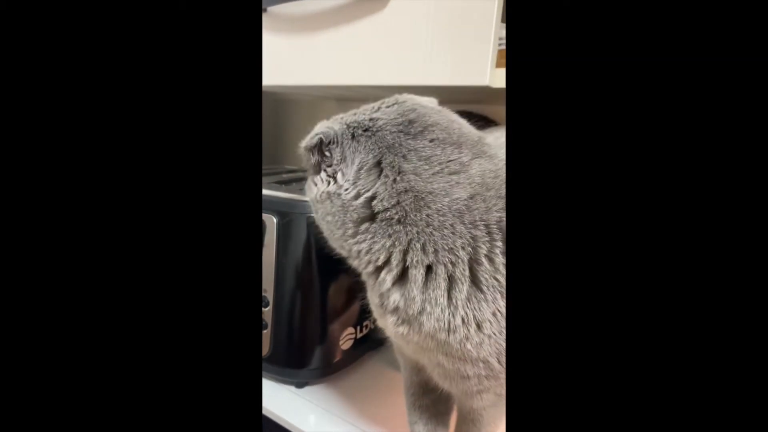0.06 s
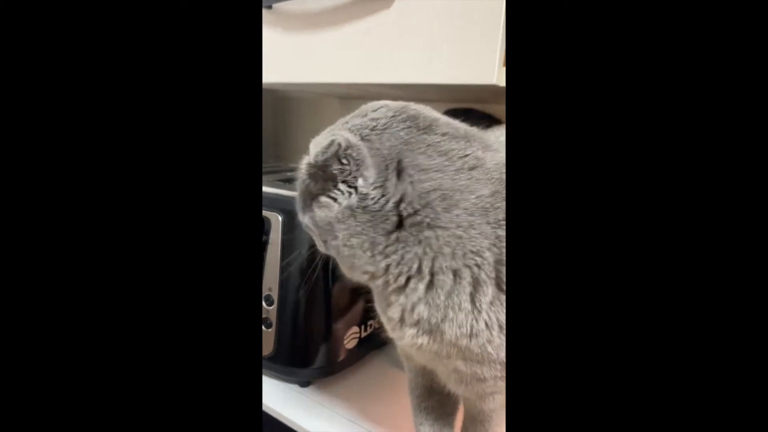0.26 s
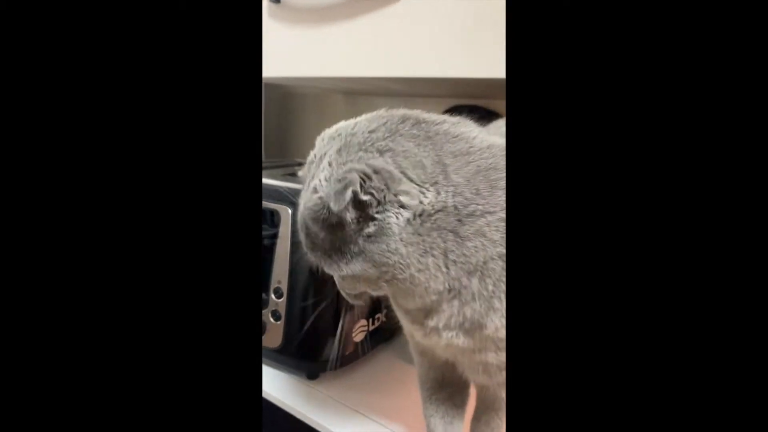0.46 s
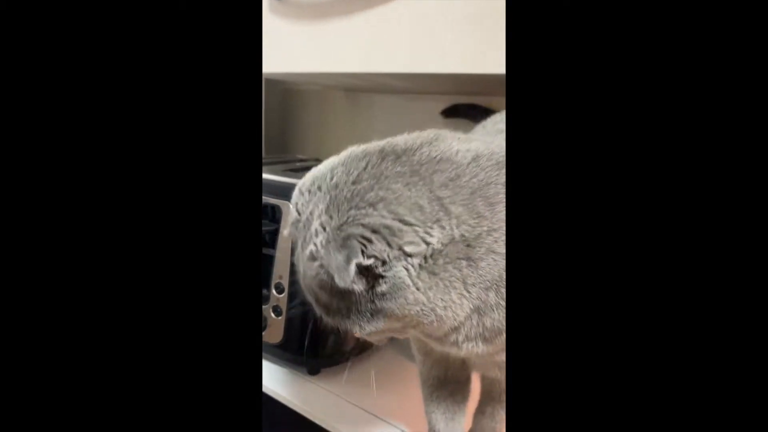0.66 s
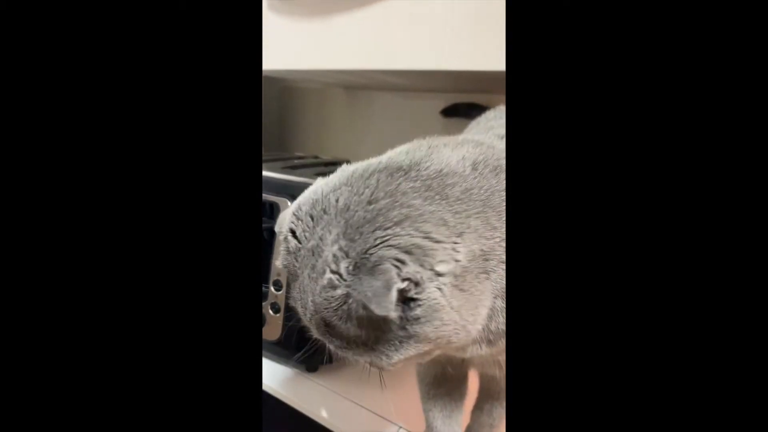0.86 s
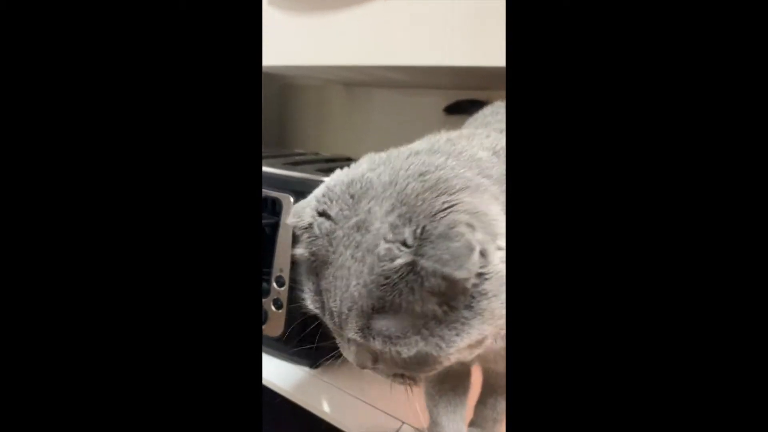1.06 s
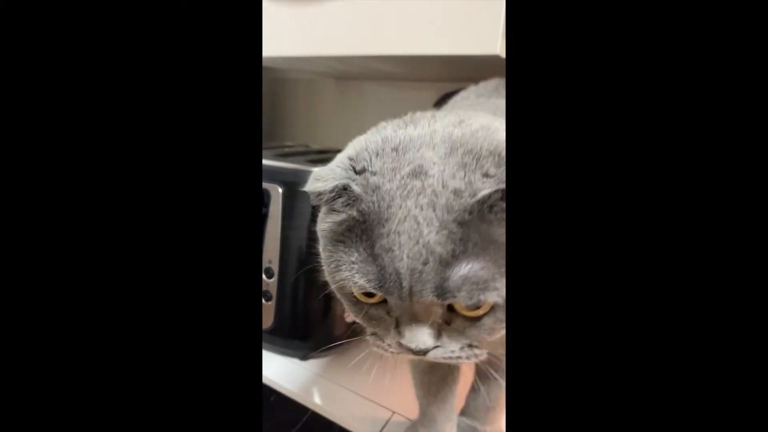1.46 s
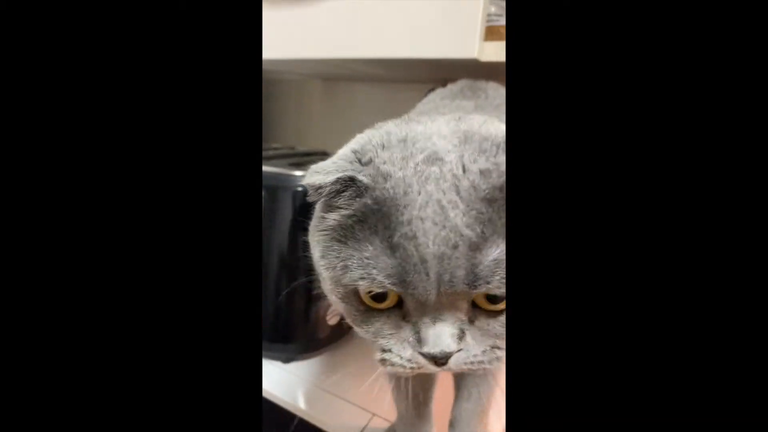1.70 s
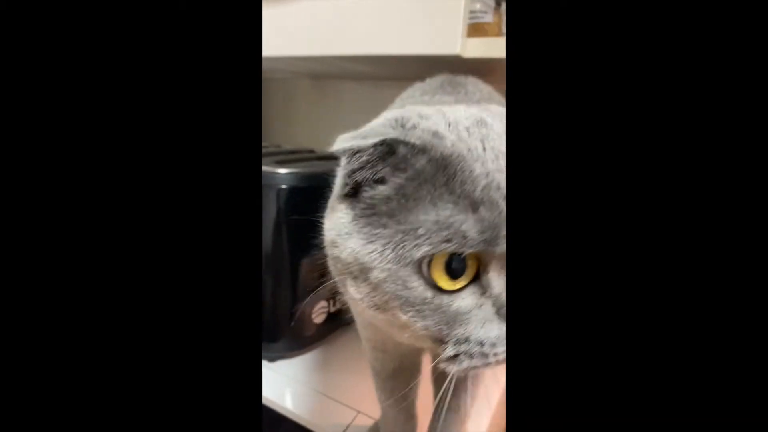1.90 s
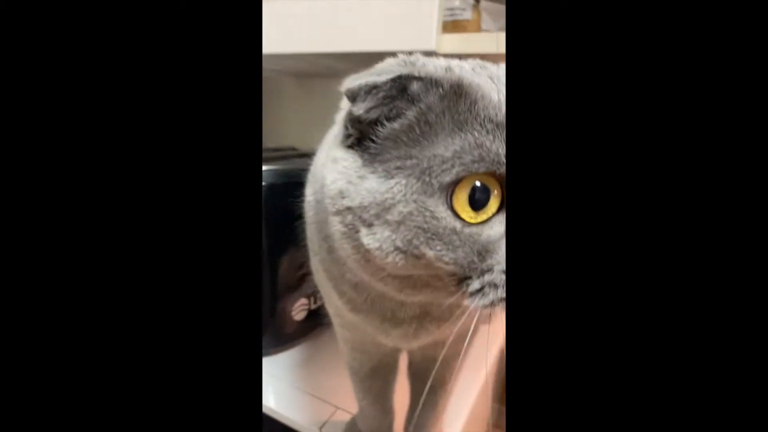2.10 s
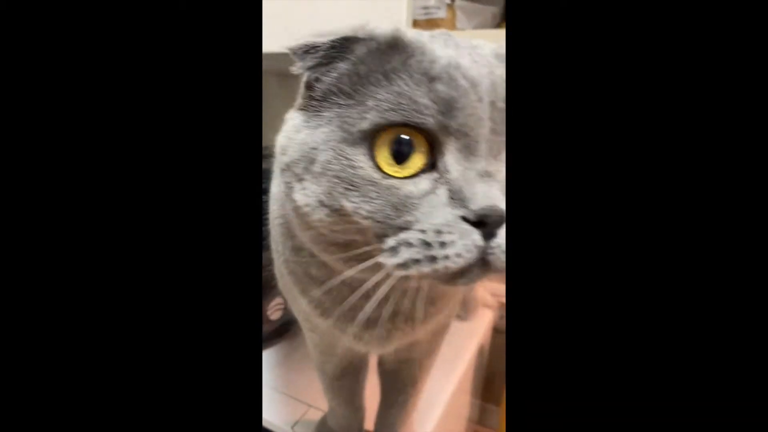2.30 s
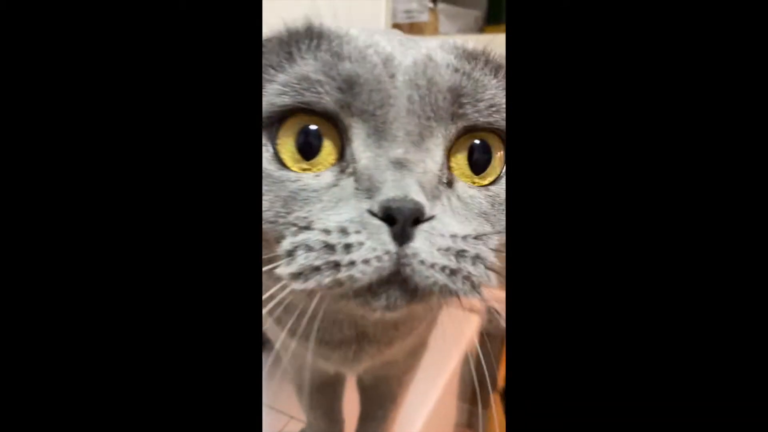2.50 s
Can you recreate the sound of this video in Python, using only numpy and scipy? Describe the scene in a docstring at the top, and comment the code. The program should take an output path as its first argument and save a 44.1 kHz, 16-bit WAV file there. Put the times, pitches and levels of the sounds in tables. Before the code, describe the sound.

A cat trills and chirps twice, close by, over a low kitchen hum.

```python
"""A low appliance hum fills a kitchen, and a few small bumps and ticks begin. A cat on the counter, close to
the microphone, chirps and trills: the pitch of its vocal folds swings about nine times a second, a second
tone crosses it, and the voice breaks into low chirps. The room rings on faintly, and three thin squeaks
pass. The cat trills again, and a few last ticks sound as the reverberation dies away."""
import sys
import numpy as np
from scipy import signal
from scipy.fft import rfft, irfft
from scipy.io import wavfile

SR = 44100
rng = np.random.default_rng(int(sys.argv[2]) if len(sys.argv) > 2 else 0)


def put_to_file(sound):
    """Save the sound as 16-bit audio at rate SR, in the file named by the first command-line argument."""
    columns = np.atleast_2d(sound).T  # one column per channel
    safe = np.clip(columns, -1, 1)
    whole_steps = np.round(safe * 32767)
    wavfile.write(sys.argv[1], SR, whole_steps.astype(np.int16))


N = 116865


def amp(db):
    """Decibels to amplitude ratio."""
    return 10 ** (np.asarray(db) / 20)


def unit(x):
    """Normalisation to rms 1."""
    return x / np.sqrt(np.mean(x ** 2) + 1e-20)


def read(points, hz):
    """Interpolation of (Hz, value) points on a log-frequency axis."""
    f, value = np.transpose(points)
    return np.interp(np.log(hz + 1), np.log(f), value)


def add(mix, s, sound):
    """Superposition: a sound joins the mix at s seconds."""
    part = mix[..., max(round(s * SR), 0):][..., :sound.shape[-1]]
    part += sound[..., :part.shape[-1]]


def noise(points):
    """Spectral shaping: white noise takes the colour of (Hz, dB) points."""
    gain = amp(read(points, np.fft.rfftfreq(N, 1 / SR)))
    return unit(irfft(rfft(rng.standard_normal(N)) * gain, N))


def wander(hz):
    """Low-pass noise: random motion up to a given rate."""
    rolloff = 1 + (np.fft.rfftfreq(N, 1 / SR) / hz) ** 4
    return unit(irfft(rfft(rng.standard_normal(N)) / rolloff, N))


def spread(mid, side, width):
    """Mid-side stereo: sum and difference give left and right."""
    return np.array([mid + width * side, mid - width * side])


def fade(t, attack_s=.011, release_s=.014):
    """Amplitude envelope with a quarter-sine rise and fall."""
    rise = np.sin(np.pi / 2 * np.clip((t - t[0]) / attack_s, 0, 1))
    fall = np.sin(np.pi / 2 * np.clip((t[-1] - t) / release_s, 0, 1))
    return rise * fall


def swing(t, times, values, shape):
    """Cosine interpolation between turning points; a shape under 1 broadens the crests."""
    i = np.clip(np.searchsorted(times, t) - 1, 0, len(times) - 2)
    progress = (1 - np.cos(np.pi * (t - times[i]) / (times[i + 1] - times[i]))) / 2
    a, b = values[i], values[i + 1]
    return np.minimum(a, b) + abs(b - a) * np.where(b > a, progress, 1 - progress) ** shape


def arch(start, end, first, middle, last):
    """Times and frequencies of a parabolic glide through three pitches."""
    t = np.arange(start, end, 1 / SR)
    parabola = np.polyfit([0, .5, 1], [first, middle, last], 2)
    return t, np.polyval(parabola, np.linspace(0, 1, len(t)))


def kitchen():
    """Appliance hum, modulated at random in amplitude and phase, over broadband air noise."""
    # Tones of the hum. Each row: frequency in Hz, level in dB.
    hum_tones = [(79.9, -58.5), (101, -68), (120, -71)]
    # Spectrum of the air. Each row: frequency in Hz, relative level in dB.
    air_colour = [(25, -22), (50, -4), (80, 3), (160, -4), (240, -5), (310, 1), (400, -6), (600, -5),
                  (1000, -1), (2000, -10), (3000, -11), (4500, -18), (7000, -34), (10000, -32),
                  (13000, -42), (16000, -46)]
    t = np.arange(N) / SR
    hum = np.zeros(N)
    for hz, db in hum_tones:
        peak = amp(db) * np.sqrt(2) * (1 + .15 * wander(hz=6))
        hum += peak * np.sin(2 * np.pi * hz * t + .25 * wander(hz=4))
    ring = amp(-51) * noise([(500, -40), (900, -14), (1100, -5), (1200, 0), (1300, -8), (1600, -22),
                             (3000, -50), (8000, -80)])  # a steady, narrow band
    air = amp(-57.5) * spread(noise(air_colour), noise(air_colour), width=.25)
    return hum + ring + air


def bumps():
    """Impact transients: a dull thud and a bright tick of noise, both decaying exponentially."""
    # Each row: start in seconds, thud level in dB, tick level in dB, tick time constant in seconds.
    impacts = [(.002, -62, -47, .03), (.161, -49, -42, .012), (.259, -46, -45, .008), (.29, -52, -31, .008),
               (.557, -47, -41, .008), (.575, -49, -32, .018), (.719, -46, -44, .012),
               (1.385, -45, -34, .009), (2.36, -58, -53, .012), (2.497, -60, -45, .006),
               (2.519, -57, -42, .009), (2.573, -60, -52, .008)]
    # Spectra of tick and thud. Each row: frequency in Hz, relative level in dB.
    tick_colour = [(150, -25), (700, -3), (1500, 5), (3000, -1), (5500, -1), (6700, -6), (7200, -22),
                   (7900, -22), (8500, -2), (10000, -6), (12000, -15), (13200, -36), (16000, -40)]
    thud_colour = [(40, -15), (120, 0), (300, 0), (600, -5), (1500, -25), (5000, -50)]
    side_colour = [(500, -25), (5000, -12), (7500, -20), (8500, 0), (12000, -3), (13200, -28)]
    out, t = np.zeros((2, N)), np.arange(SR // 3) / SR
    tail = amp(-15) * np.exp(-t / .065)
    for start, thud_db, tick_db, decay_s in impacts:
        envelope = (1 - np.exp(-t / .001)) * (np.exp(-t / decay_s) + tail)
        tick = envelope * spread(noise(tick_colour), noise(side_colour), width=.35)[:, :len(t)]
        thud = noise(thud_colour)[:len(t)] * (1 - np.exp(-t / .002)) * np.exp(-t / .02)
        add(out, start, amp(tick_db) * tick + amp(thud_db) * thud)
    return out


def voice(t, hz, level_db, treble_db, flutter, second_harmonic_db):
    """Source and filter: the throat shapes unsteady vocal-fold harmonics; noise adds a little rasp."""
    # Response of throat and mouth. Each row: frequency in Hz, gain in dB.
    throat = [(550, -12), (800, -6), (1000, -4), (1230, 0), (1500, -6), (1800, -12), (2100, -13),
              (2450, -17), (3000, -22), (3600, -14), (4100, -26), (4500, -18), (4900, -12), (5150, -14),
              (5500, -29), (6300, -33), (7400, -28), (8500, -42), (10000, -56), (14000, -72)]
    # How harmonics above the second follow the treble. Each row: frequency in Hz, factor on treble_db.
    treble_share = [(2000, .7), (3300, 1.05), (5200, 1.2), (8500, 1.8)]
    jitter, shimmer, flutter_hz = .005, .09, 240
    n = len(t)
    phase = 2 * np.pi * np.cumsum(hz * (1 + jitter * wander(hz=200)[:n])) / SR
    tone = np.zeros(n)
    for k in range(1, 14):
        trim_db = (k > 2) * read(treble_share, k * hz) * treble_db + (k == 2) * second_harmonic_db
        tone += amp(read(throat, k * hz) + trim_db) * np.sin(k * phase)
    # A second, slower oscillation modulates the amplitude and puts sidebands around each harmonic.
    tone *= 1 + flutter * np.sin(2 * np.pi * flutter_hz * t) + shimmer * wander(hz=120)[:n]
    rasp_colour = [(400, -30), (1100, 0), (2500, -5), (5000, -5), (8000, -18), (13000, -35)]
    rasp = amp(-42 + treble_db / 2) * noise(rasp_colour)[:n]
    return np.sqrt(2) * amp(level_db) * fade(t) * (tone + rasp)


def glides(rows, second_harmonic_db):
    """Frequency sweeps of the voice: short curved notes, softer and duller at their ends."""
    out = np.zeros(N)
    for *contour, level_db, treble_db, flutter in rows:
        t, hz = arch(*contour)
        edge = np.linspace(-1, 1, len(t)) ** 2
        note = voice(t, hz, level_db - 7 * edge, treble_db - 9 * edge, flutter, second_harmonic_db)
        add(out, t[0], note)
    return out


def chirps():
    """Register breaks: the voice drops to low notes with a full second harmonic."""
    # Each row: start and end in seconds, first, middle and last pitch in Hz, source level in dB,
    # treble in dB, flutter depth from 0 to 1.
    low_notes = [(.186, .212, 520, 570, 630, -42, -20, 0), (.203, .243, 770, 850, 950, -21, -15, 0),
                 (.258, .305, 650, 705, 785, -25, -10, 0), (.506, .534, 700, 790, 930, -24, -3, 0),
                 (.612, .645, 670, 750, 910, -25, -3, 0), (.733, .818, 630, 865, 630, -24, -13, 0),
                 (.8, .865, 650, 580, 555, -31, -22, 0), (1.519, 1.562, 640, 700, 790, -25, -16, 0),
                 (1.65, 1.705, 780, 750, 660, -26, -8, 0), (1.706, 1.755, 660, 740, 940, -23, -6, 0),
                 (2.22, 2.254, 670, 750, 930, -24, -9, 0), (2.336, 2.434, 610, 760, 600, -25.5, -17, 0)]
    return glides(low_notes, second_harmonic_db=0)


def trills():
    """Frequency and amplitude modulation in step: the high register swings, louder on each crest."""
    # Crests and troughs. Each row: time in seconds, pitch in Hz, source level in dB, treble in dB,
    # flutter depth from 0 to 1.
    first_trill = [(.235, 955, -29, -12, 0), (.295, 980, -25, -18, 0), (.339, 830, -22, -22, 0),
                   (.378, 1050, -13, -4, 0), (.399, 1230, -19, -6, .2), (.439, 1055, -24, -8, .1),
                   (.493, 1285, -13, -2, .05), (.545, 1025, -27, -5, .1), (.596, 1250, -16, 0, .05),
                   (.653, 990, -28, -4, .1), (.704, 1205, -20, 3, .05), (.77, 970, -30, -3, 0)]
    second_trill = [(1.553, 925, -17, -21, 0), (1.596, 850, -24, -23, 0), (1.634, 1070, -13, -6, 0),
                    (1.649, 1245, -18, -2, .3), (1.694, 1055, -24, -6, .05), (1.746, 1285, -13, 0, .05),
                    (1.797, 1040, -24, -6, .05), (1.849, 1285, -14, 0, .05), (1.903, 1005, -24, -7, .05),
                    (1.956, 1235, -17, 1, .2), (2.011, 960, -23, -12, .1), (2.063, 1215, -15, -15, .2),
                    (2.109, 935, -23, -22, .1), (2.165, 1210, -16, -16, .2), (2.222, 890, -30, -22, .1),
                    (2.243, 1050, -36, -25, .1), (2.268, 1185, -14, -30, .25), (2.329, 885, -28, -28, .1)]
    out = np.zeros(N)
    for rows in (first_trill, second_trill):
        times, pitches, levels, trebles, flutters = np.transpose(rows)
        t = np.arange(times[0], times[-1], 1 / SR)
        hz = swing(t, times, pitches, shape=.88)
        level_db = swing(t, times, levels, shape=.75)
        treble_db = swing(t, times, trebles, shape=.75)
        flutter = np.interp(t, times, flutters)
        add(out, t[0], voice(t, hz, level_db, treble_db, flutter, second_harmonic_db=-10))
    return out


def crossing_tone():
    """Biphonation: a second pitch sounds together with the trill and crosses it."""
    # Each row: start and end in seconds, first, middle and last pitch in Hz, source level in dB,
    # treble in dB, flutter depth from 0 to 1.
    crossing_notes = [(.298, .372, 1010, 1205, 990, -17, -16, .3),
                      (.408, .478, 1080, 1215, 1060, -18, -14, .25),
                      (.465, .515, 1120, 960, 950, -21, -22, 0),
                      (.53, .577, 1160, 1210, 1110, -18, -13, .25),
                      (.572, .617, 1100, 950, 940, -23, -22, 0),
                      (.64, .692, 1140, 1205, 1060, -19, -14, .25), (.68, .72, 1080, 940, 930, -25, -22, 0),
                      (1.8, 1.885, 960, 1160, 1080, -16, -12, .1),
                      (1.915, 1.995, 990, 1205, 1020, -23, -12, .1),
                      (2.015, 2.15, 795, 905, 765, -19, -12, 0)]
    return glides(crossing_notes, second_harmonic_db=-10)


def room(x):
    """Reverberation by convolution: early reflections, then a faint diffuse tail and a narrow ring."""
    # Reflections from counter and cupboards. Each row: delay in seconds, gain in dB.
    echoes = [(.0031, -20), (.0074, -22), (.0135, -23), (.021, -25)]
    # Decay of the tail. Each row: frequency in Hz, time to fall 60 dB in seconds.
    decay_times = [(200, .6), (700, 1.7), (1200, 1.7), (2400, 2), (4800, 1.5), (8000, .4)]
    # Strength of the tail. Each row: frequency in Hz, gain in dB.
    tail_colour = [(200, -30), (550, -25), (800, -12), (1200, -14), (1500, -19), (2000, -13), (2400, -9),
                   (2800, -19), (3600, -27), (5000, -26), (8000, -33)]
    # Resonances that the voice sets off. Each row: frequency in Hz, gain in dB, t60 in seconds.
    modes = [(1190, -76, 1.6), (1213, -76, 1.6)]
    hz, t, spectra = signal.stft(rng.standard_normal((2, 2 * SR)), SR, nperseg=512)
    t60 = read(decay_times, hz)[:, None]
    energy_norm = np.sqrt(2 * np.log(1000) / (t60 * SR))  # makes energy independent of decay time
    spectra *= amp(read(tail_colour, hz)[:, None] - 60 * t / t60) * energy_norm
    response = spread(*signal.istft(spectra, SR, nperseg=512)[1], width=.2)
    age = np.arange(response.shape[1]) / SR
    for mode_hz, db, mode_t60 in modes:
        add(response, 0, amp(db - 60 * age / mode_t60) * np.sin(2 * np.pi * mode_hz * age))
    for delay, db in echoes:
        add(response, delay, amp([db]))
    return signal.fftconvolve(x[None], response, axes=1)[:, :N]


def squeaks():
    """Pure tones with frequency jitter: thin arched whistles between the calls."""
    # Each row: start and end in seconds, first, middle and last pitch in Hz, level in dB.
    whistles = [(.935, 1.04, 2850, 3150, 3000, -58), (1.28, 1.36, 2900, 4150, 2900, -61),
                (1.42, 1.52, 2950, 3150, 3080, -59)]
    out = np.zeros(N)
    for *contour, level_db in whistles:
        t, hz = arch(*contour)
        hz *= 1 + .015 * wander(hz=300)[:len(t)]
        add(out, t[0], amp(level_db) * fade(t) * np.sin(2 * np.pi * np.cumsum(hz) / SR))
    return out


def scene():
    """Superposition of hum, bumps, the direct calls and their reverberation."""
    # Left-right difference of the direct sound. Each row: frequency in Hz, side gain in dB.
    side_colour = [(1200, -36), (1800, -22), (2500, -8), (3500, -14), (5000, -19), (8000, -10)]
    calls = trills() + crossing_tone() + chirps() + squeaks()
    side_gain = amp(read(side_colour, np.fft.rfftfreq(N, 1 / SR)))
    side = irfft(1j * rfft(calls) * side_gain, N)  # in quadrature, so the channels differ in phase
    return spread(calls, side, width=1) + room(calls) + bumps() + kitchen()


def record(dry):
    """Band limiting by a linear-phase low-pass filter."""
    cutoff_hz = 15700
    lowpass = signal.firwin(511, cutoff_hz, window=("kaiser", 9), fs=SR)
    return signal.oaconvolve(dry, lowpass[None], "same")


dry = scene()
out = record(dry)
put_to_file(out)
```